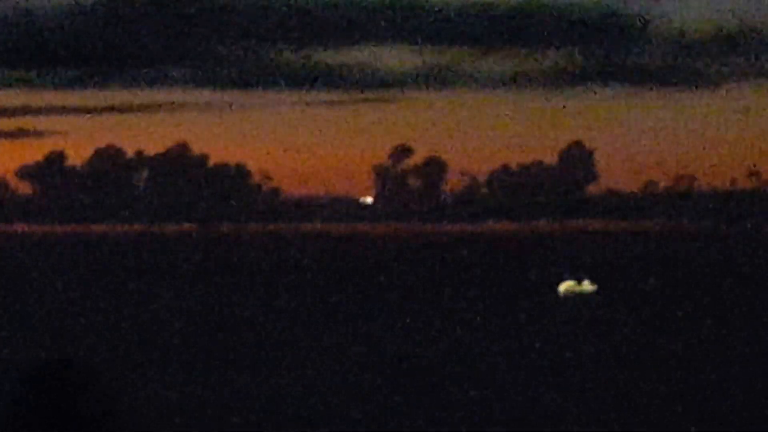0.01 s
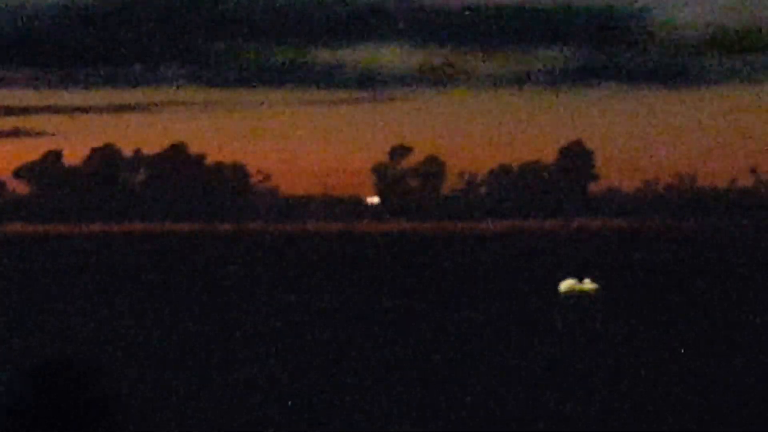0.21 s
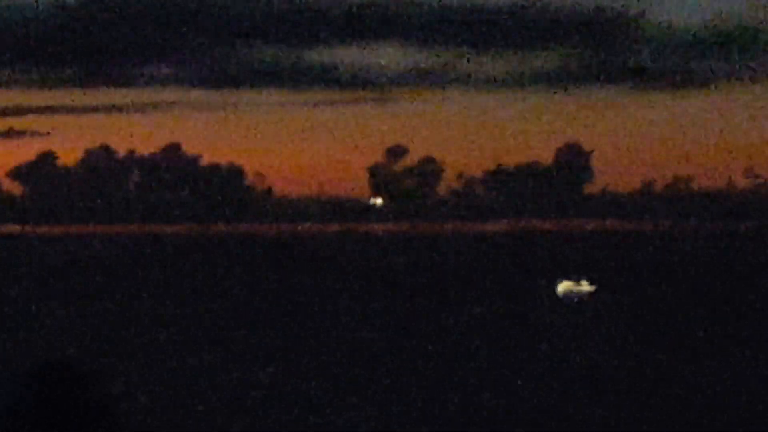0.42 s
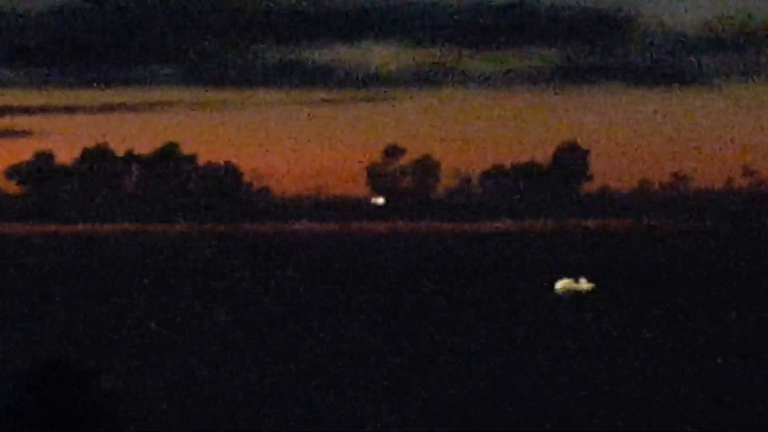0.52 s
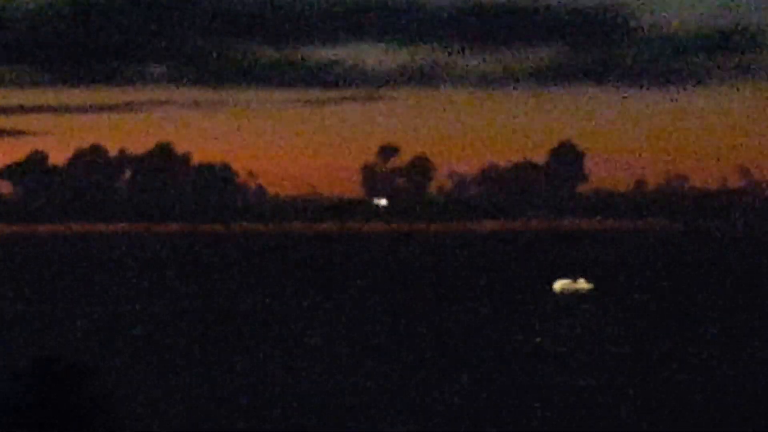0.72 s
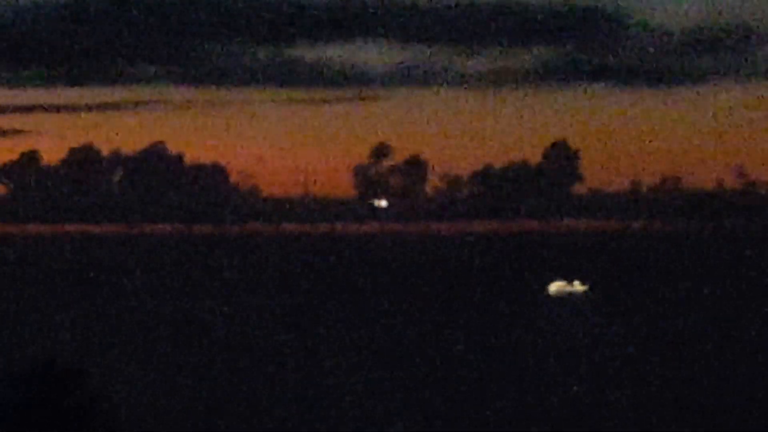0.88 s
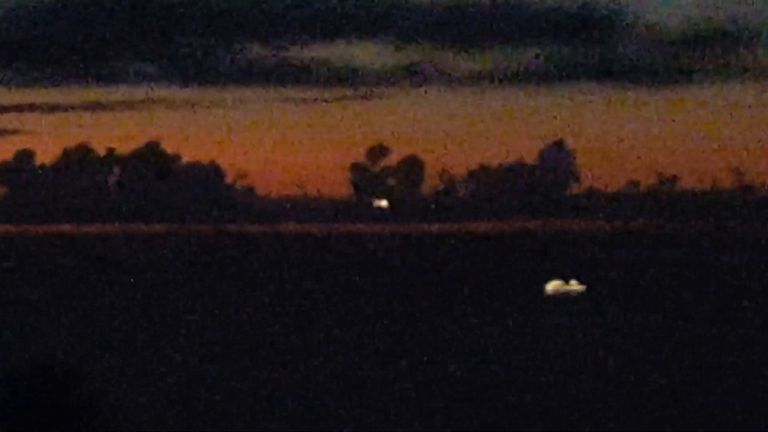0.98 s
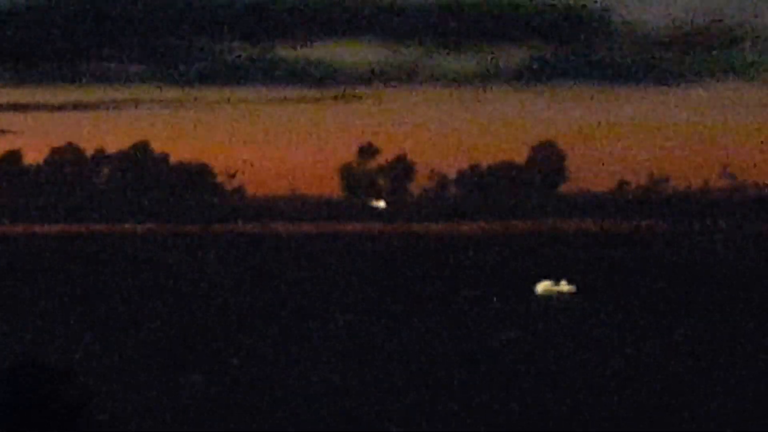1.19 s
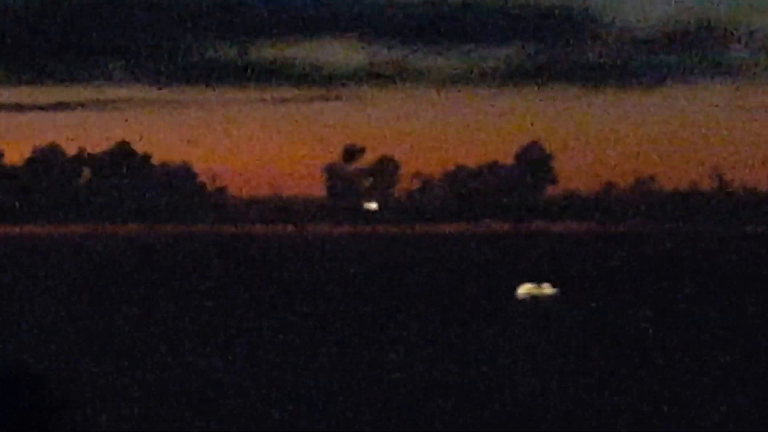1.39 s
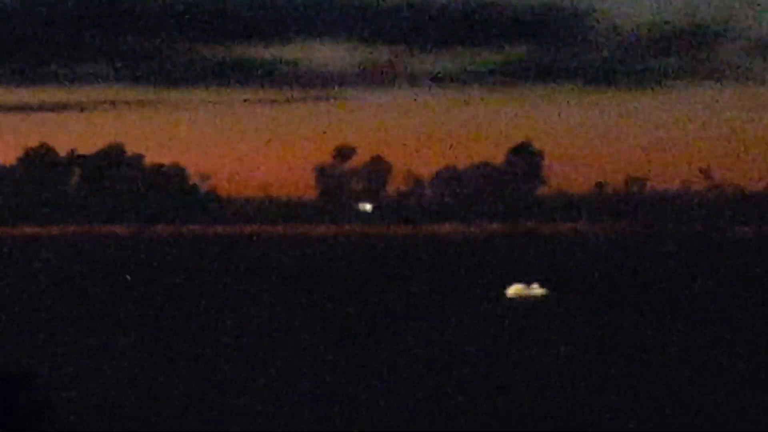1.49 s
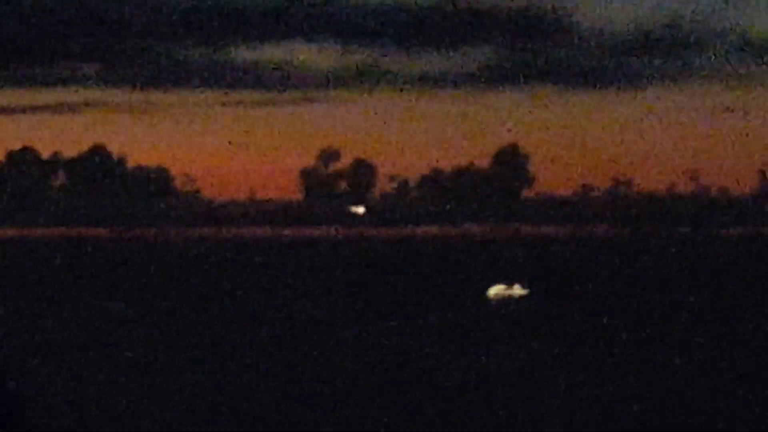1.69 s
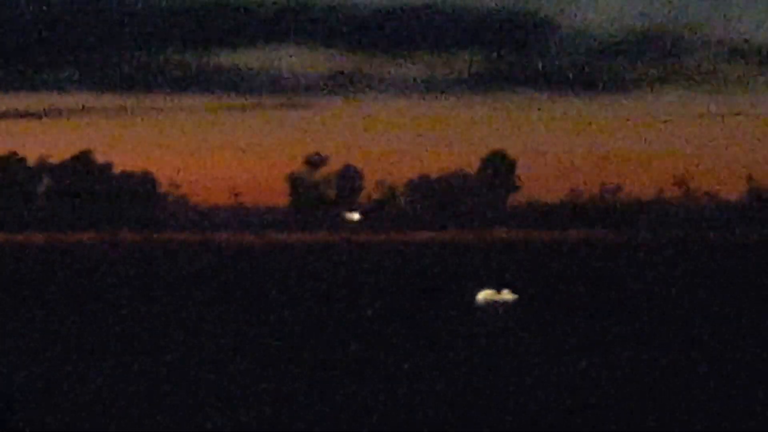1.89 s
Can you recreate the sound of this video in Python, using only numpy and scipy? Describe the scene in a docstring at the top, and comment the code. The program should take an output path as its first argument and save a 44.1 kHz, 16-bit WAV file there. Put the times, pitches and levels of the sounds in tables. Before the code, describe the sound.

Many tiny frogs pipe low-then-rising whistles outdoors, near and far, above a thin steady insect whine

```python
"""Small tree frogs whistle at dusk: low, almost level 'co' notes and rising 'kee' notes, both swept sines.
Near frogs stand out of a far chorus of the same whistles heard only through the trees' sparse noise tail.
Katydids buzz high up as gated noise; crickets trill below them as narrow, throbbing noise bands.
Distant machinery rumbles and drones as filtered noise, and two soft puffs pass nearby.
Foliage throws each whistle back to the two microphones as echoes and a dying tail."""
import sys
import numpy as np
from scipy import signal
from scipy.fft import rfft, irfft
from scipy.io import wavfile
from scipy.ndimage import uniform_filter1d

SR = 44100
rng = np.random.default_rng(int(sys.argv[2]) if len(sys.argv) > 2 else 0)


def bounce(signal):
    """Save signal as a 16-bit WAV file at the path given by the first command-line argument."""
    frames = np.transpose(np.atleast_2d(signal))
    limited = np.clip(frames, -1, 1)
    pcm = np.round(limited * 32767).astype(np.int16)
    wavfile.write(sys.argv[1], SR, pcm)


N = 85995


def gain_of(db):
    """Turns dB into an amplitude gain."""
    return 10 ** (np.asarray(db) / 20)


def evened(x):
    """Scales to rms 1, over all channels together."""
    return x / np.sqrt(np.mean(x ** 2) + 1e-20)


def colour(x, points):
    """Filters by a table of (frequency [Hz], level [dB]), joined on a log-frequency axis."""
    f, db = np.transpose(points)
    hz = np.fft.rfftfreq(x.shape[-1], 1 / SR)
    curve_db = np.interp(np.log(hz + 1), np.log(f), db, -90, -90)
    return irfft(rfft(x) * gain_of(curve_db), x.shape[-1])


def band(hz, width_hz, channels=2):
    """Noise in a bell-shaped band, rms 1; around 0 Hz it is a slow random wavering."""
    f = np.fft.rfftfreq(N, 1 / SR)
    bell = np.exp(-((f - hz) / width_hz) ** 2)
    return evened(irfft(rfft(rng.standard_normal((channels, N))) * bell, N))


def foliage(x, t60, direct, wet, echo_db=0):
    """Leaves scatter sound into a few echoes and a sparse dying tail, different for each side."""
    # echoes, before the direct and wet gains: (delay [s], left level [dB], right level [dB])
    echoes = [(.007, -13.5, -26), (0.012, -8, -13), (0.025, -13, -15.5), (0.035, -16, -23.5),
              (0.051, -15.5, -19), (0.077, -20, -18.5)]
    tail_db, density = -8.5, .05  # tail energy on the left; share of samples that carry a reflection
    t = np.arange(SR // 2) / SR
    hits = rng.standard_normal((2, len(t))) * (rng.random((2, len(t))) < density)
    tail = hits * gain_of(-60 * t / t60) * (t > .01)
    tail *= gain_of(tail_db) / np.linalg.norm(tail[0])
    for delay, left_db, right_db in echoes:
        tail[:, round(delay * SR)] += direct * gain_of(np.array([left_db, right_db]) + echo_db)
    return direct * x + wet * signal.fftconvolve(x, tail, axes=1)[:, :N]


def night_air():
    """Low rumble and hiss, near mono in the bass because long waves reach both microphones alike."""
    # rumble and hiss spectrum: (frequency [Hz], level [dB])
    air = [(20, -49), (60, -4), (100, -8), (145, -0.5), (200, -5.5), (260, -8.5), (500, -15), (1100, -24.5),
           (2100, -28.5), (3300, -37), (7000, -45.5), (16000, -47.5)]
    # likeness of the two sides: (frequency [Hz], left-right likeness [0-1])
    likeness = [(60, .97), (200, 0.94), (300, 0.89), (640, 0.29), (1400, 0.033), (16000, .05)]
    air_db = -53.5
    left, other = rfft(rng.standard_normal((2, N)))
    f, value = np.transpose(likeness)
    same = np.clip(np.interp(np.log(np.fft.rfftfreq(N, 1 / SR) + 1), np.log(f), value), 0, 1)
    right = same * left + np.sqrt(1 - same ** 2) * other
    wash = colour(irfft([left, right], N), air)
    return gain_of(air_db) * evened(wash)


def engine_drone():
    """A distant engine's low drone: a narrow band of noise, equal on both sides, wavering in level."""
    # drone level: (time [s], level [dB])
    hum = [(0.0, -57), (0.64, -53), (0.668, -66), (0.732, -54), (0.83, -58.5), (0.862, -50), (1.4, -65.5),
           (1.428, -61), (1.932, -63.5), (1.95, -71)]
    hum_hz, hum_width_hz = 189.9, 22.6
    level_db = np.interp(np.arange(N) / SR, *np.transpose(hum))
    return band(hum_hz, hum_width_hz, channels=1) * gain_of(level_db)


def crickets():
    """Far crickets overlap into a narrow, throbbing noise band, with two finer trill bands."""
    # spectrum of the mass of crickets: (frequency [Hz], level [dB])
    mass = [(4900, -13.5), (5100, -14.5), (5300, -17), (5500, 7.5), (5680, 3.5), (5900, 0), (6050, -68),
            (6200, -36.5)]
    # single crickets: (frequency [Hz], level [dB])
    trill = [(5179, -79.5), (5674, -66)]
    mass_db, throb_db, chirr_db = -61.5, 1.5, 1  # mass level is before the throb
    throb = throb_db * band(17.4, 4.8, channels=1)
    chirr = chirr_db * band(89, 38)  # fast grain of many overlapping trills
    noise = evened(colour(rng.standard_normal((2, N)), mass))
    trills = sum(gain_of(db) * band(hz, 25) for hz, db in trill)
    return gain_of(mass_db) * noise * gain_of(throb + chirr) + trills


def katydid(row, wing):
    """Short wing strokes, partly alike from cycle to cycle, over their own blurred echoes."""
    # strokes within a wing cycle: (place [0-1], level [dB])
    strokes = [(0, 0), (.27, -9), (.6, -6)]
    # raw scrape before the wing rings: (frequency [Hz], level [dB])
    raw_scrape = [(6000, -6), (15000, 0), (20000, 0)]
    stroke_s, wander = .0007, .0007  # stroke width; relative drift of the wing rate (rms)
    repeat, blur_db = .4, 5  # weight of the repeating scrape; steady blur against the strokes
    wing_same, wing_lag_ms = 0.55, .3  # share of the left hiss that the right microphone hears later
    start, end, rate, left_db, right_db, left_at, right_at = row
    t = np.arange(N) / SR
    drift = wander * evened(uniform_filter1d(rng.standard_normal(N), 6000))
    cycle = (rate * t + np.cumsum(drift) * rate / SR - np.array([[left_at], [right_at]])) % 1

    gate = 0
    for at, db in strokes:
        from_stroke_s = ((cycle - at + .5) % 1 - .5) / rate
        gate = gate + gain_of(db) * np.exp(-.5 * (from_stroke_s / stroke_s) ** 2)

    # the same row of teeth is read in every cycle
    teeth = rng.standard_normal((2, 512))
    alike = np.array([np.interp(cycle[k] * SR / rate, np.arange(512), teeth[k]) for k in range(2)])
    hiss = rng.standard_normal((2, N))
    shared = np.roll(hiss[0], round(wing_lag_ms * SR / 1000))
    hiss[1] = wing_same * shared + np.sqrt(1 - wing_same ** 2) * hiss[1]
    scrape = repeat * evened(colour(alike, raw_scrape)) + (1 - repeat) * evened(colour(hiss, raw_scrape))

    sound = colour(evened(scrape) * (evened(gate) + gain_of(blur_db)), wing)
    fade = np.clip(np.minimum(t - start, end - t) / 0.018, 0, 1)
    return evened(sound) * gain_of([[left_db], [right_db]]) * fade


def katydids():
    """Two katydids, each scrape coloured by the ringing of its own wings."""
    # insects: (start [s], end [s], wing rate [cycles/s], left level [dB], right level [dB],
    #           left cycle start [0-1], right cycle start [0-1])
    singers = [(-.1, 2.1, 126.8, -54.5, -50.5, .7, .6), (-.1, 0.784, 134.5, -52.5, -52, .12, .07)]
    # wing resonances of the first and second insect: (frequency [Hz], level [dB])
    first_wing = [(7600, -21.5), (8200, -15), (8900, -1), (9400, 2.5), (9650, -1.5), (9800, 3), (10200, -4),
                  (10900, -4), (11400, 0), (11700, -1.5), (12300, 0), (12800, 2), (13100, -1), (13700, -3),
                  (14300, -10.5), (14700, -14.5), (15100, -14), (15400, -25.5), (15750, -18)]
    second_wing = [(10500, -9.5), (11400, -2.5), (12000, 0), (12400, -4), (12800, 2), (13200, -0.5),
                   (13750, 1.5), (14300, 0), (14700, -7), (15200, -12), (15750, -21)]
    return katydid(singers[0], first_wing) + katydid(singers[1], second_wing)


def far_chorus(count=260):
    """Many distant frogs at random moments, heard only as the tail scattered by the trees."""
    # pitch range of the far low notes: (lowest [Hz], highest [Hz])
    low_range = (1425, 1672)
    # range of the top of the far high notes: (lowest [Hz], highest [Hz])
    high_range = (2507, 3040)
    # swell of the far high notes: (time [s], level [dB])
    far_swell = [(0, 2), (.3, 0.5), (.6, 1.5), (.75, 0.5), (1, 0.5), (1.2, -1), (1.399, -0.5), (1.65, -1.5),
                 (1.95, 4)]
    low_db, high_db, spread_db = -63, -59, 6  # high level is before its swell; spread is plus or minus
    low, high, span = np.zeros((2, N)), np.zeros((2, N)), N / SR
    for k, (moment, pitch, loudness, side) in enumerate(rng.random((count, 4))):
        start = (k + moment) / count * span - .05
        db = spread_db * (2 * loudness - 1)
        lag_ms = side - .5
        low_hz = np.interp(pitch, [0, 1], low_range)
        top_hz = np.interp(pitch, [0, 1], high_range)
        low += co(start, 0.0863, low_hz, db, db, -42.5, lag_ms, 0)
        # high notes take the same moments, counted back from the end
        high += kee(span - start - .1, 0.1001, top_hz - 330, top_hz, db, db, 0.86, 0.87, lag_ms)
    swell_db = np.interp(np.arange(N) / SR, *np.transpose(far_swell))
    far_low = gain_of(low_db) * evened(foliage(low, 1.5, 0, 1))
    far_high = gain_of(high_db + swell_db) * evened(foliage(high, 0.54, 0, 1))
    return far_low + far_high


def rustles():
    """Two faint puffs of dull noise nearby, each under a bell-shaped envelope."""
    # puffs: (centre time [s], length [s], level before the envelope [dB], top frequency [Hz])
    puffs = [(1.352, 0.018, -47.5, 613), (1.595, 0.019, -50.5, 2490)]
    t = np.arange(N) / SR
    out = np.zeros((2, N))
    for centre, length, db, top_hz in puffs:
        spectrum = [(200, 0), (top_hz, -8), (top_hz * 3, -25)]
        noise = evened(colour(rng.standard_normal((2, N)), spectrum))
        out += gain_of(db) * np.exp(-((t - centre) / length * 2) ** 2) * noise
    return out


def whistle(start, length, lag_ms, pitch, level_db, rise, fall, octave_db):
    """A near-pure tone from the vocal sac, heard by both microphones; pitch and level_db are curves."""
    third_db = -20.5  # third harmonic, below the octave
    first = max(round((start - .002) * SR), 0)
    last = min(round((start + length + .002) * SR), N)
    at = np.arange(first, last)
    t = at / SR - start - np.array([[0], [lag_ms / 1000]])
    inside = np.clip(t, 0, length)
    ramp = np.clip(np.minimum(t / rise, (length - t) / fall), 0, 1)
    shape = np.sin(np.pi / 2 * ramp) ** 2
    phase = 2 * np.pi * np.cumsum(pitch(inside) * (t > 0), 1) / SR
    overtones = gain_of(octave_db) * (np.sin(2 * phase) + gain_of(third_db) * np.sin(3 * phase))
    out = np.zeros((2, N))
    out[:, at] = np.sqrt(2) * shape * gain_of(level_db(inside / length)) * (np.sin(phase) + overtones)
    return out


def co(start, length, hz, left_db, right_db, octave_db, lag_ms, swell_db):
    """The low note scoops up to pitch and sags a little."""
    scoop_hz, scoop_s, sag_hz = 64.8, .02, 37.8
    rise_s, fall_s = 0.014, 0.015

    def pitch(t):
        return hz - scoop_hz * np.exp(-t / scoop_s) - sag_hz * (t / length) ** 3

    def level_db(place):
        return np.array([[left_db], [right_db]]) - swell_db * np.maximum(1 - place / 0.6, 0)

    return whistle(start, length, lag_ms, pitch, level_db, rise_s, fall_s, octave_db)


def kee(start, length, first_hz, last_hz, left_db, right_db, left_swell_db, right_swell_db, lag_ms,
        far_db=0):
    """The high note sweeps up, fast at first; its level moves by the swell, then fades."""
    bend, peak, fade_db = 2.131, .62, 7  # sweep curvature; place where the fade begins [0-1]; fade
    rise_s, soft_s_per_db, fall_s = 0.0014, .0004, 0.024  # quiet notes start more slowly
    swell_db = np.array([[left_swell_db], [right_swell_db]])

    def pitch(t):
        swept = (1 - np.exp(-bend * t / length)) / (1 - np.exp(-bend))
        return first_hz + (last_hz - first_hz) * swept

    def level_db(place):
        swell = swell_db * np.maximum(1 - place / peak, 0)
        fade = fade_db * np.maximum(place - peak, 0) / (1 - peak)
        return np.array([[left_db], [right_db]]) - swell - fade

    return whistle(start, length, lag_ms, pitch, level_db, rise_s + soft_s_per_db * far_db, fall_s, -61.0)


def near_low_notes():
    """The near frogs' 'co' notes, fluttering together, with the foliage's answer."""
    # notes, levels before flutter and foliage: (start [s], length [s], pitch [Hz], left level [dB],
    #   right level [dB], octave level [dB re fundamental], right lag [ms], swell [dB])
    low_notes = [(.048, .048, 1496, -53, -55, -30, 0.25, 4), (.11, .06, 1500, -54, -57, -30, 0.24, 6),
                 (.138, 0.09, 1596, -36.5, -39.5, -21.5, 0.28, 3),
                 (.16, 0.083, 1525, -35.5, -38, -15, 0.25, 8.5),
                 (.225, .09, 1545, -40, -43.5, -10, .24, -3),
                 (0.251, 0.097, 1588, -41.5, -50.5, -25.5, .25, 1),
                 (0.427, 0.13, 1653, -47.5, -52, -36.5, .0524, -7),
                 (.555, 0.064, 1546, -51, -62, -14.5, .12, 2), (.6, 0.075, 1471, -48, -53, -2, 0.18, 4),
                 (.76, 0.087, 1536, -56, -73, -27.5, .12, 0), (1.138, .076, 1558, -30, -38, -34, 0.26, 13),
                 (1.217, .042, 1550, -31.5, -46, -41, 0.16, 6.5),
                 (1.242, 0.031, 1552, -48, -46, -41.5, 0.23, 0), (1.27, .05, 1540, -54, -56, -30, .11, -2),
                 (1.5, 0.064, 1495, -51, -57, -27, 0.27, 3),
                 (1.885, 0.084, 1637, -50.5, -55, -18, 0.099, 4),
                 (1.885, 0.095, 1438, -57.5, -59, -23, .14, -7)]
    flutter = gain_of(.7 * band(0, 30))  # 0.7 dB rms
    low = sum(co(*row) for row in low_notes) * flutter
    return foliage(low, 0.39, 0.81, .4, echo_db=-9)


def near_high_notes():
    """The near frogs' 'kee' notes; quieter frogs sit further off, flutter more and arrive more blurred."""
    # notes, levels before flutter and foliage: (start [s], length [s], first pitch [Hz],
    #   last pitch [Hz], left level [dB], right level [dB], left swell [dB], right swell [dB], right lag [ms])
    high_notes = [(-.04, 0.09, 2574, 2888, -52, -64, -5, -9, .079),
                  (-.01, 0.092, 2500, 2700, -55.5, -60, -8.5, -8, -0.2),
                  (0.126, 0.089, 2600, 2876, -56, -57.5, -5.5, -6, 0.38),
                  (0.164, .13, 2500, 2844, -49, -51, 1, -0.5, 0.078),
                  (.309, .125, 2270, 2660, -52, -47, -3, 3, -.2),
                  (0.366, 0.048, 2800, 2970, -55, -56, 8.5, 9, 0.23),
                  (0.39, .105, 2480, 2850, -35, -33.5, -7, 12, 0.36),
                  (.42, .115, 2350, 2840, -30, -21, 10, 16, -.27),
                  (.463, .04, 2700, 2800, -24, -36, 0, 0, .3),
                  (0.511, 0.04, 2850, 2976, -45.5, -43, 6.5, 6.5, 0.083),
                  (.517, .1, 2390, 2770, -37, -36, -4.5, 12, .13),
                  (0.794, 0.085, 2520, 2848, -47, -46, 1, 3, 0.28),
                  (.838, .11, 2320, 2740, -43.5, -46, 6, 5, 0.29),
                  (.925, .065, 2450, 2700, -56, -58, -4, -4, 0.074),
                  (0.974, 0.069, 2500, 2713, -57, -60, 1, 2, .08),
                  (1.04, .08, 2650, 2920, -59, -58.5, 1, 4, .063),
                  (1.124, .1, 2700, 3075, -64, -66, -2, -1, 0.077),
                  (1.2, 0.071, 2750, 3022, -61.5, -65, 3, 4, 0.066),
                  (1.345, .1, 2330, 2727, -55, -58.5, 6, 6, 0.12),
                  (1.423, .105, 2240, 2750, -28, -31, 19, 19, -.057),
                  (1.518, .07, 2580, 2730, -39, -42, 0, 0, .1),
                  (1.665, .11, 2230, 2560, -57, -59, 8.5, 8.5, 0.067),
                  (1.735, .085, 2480, 2700, -56, -55, -2, -2, 0.027),
                  (1.847, 0.087, 2480, 2685, -57, -62, -1.5, -2, 0.073)]
    near_db, wet_per_db = -28.5, 0.4672  # level of a frog that counts as near; added blur per dB below it
    flutter_db, flutter_per_db = .8, .15
    shimmer = band(0, 63.5)  # moving air and leaves
    notes, blurred = np.zeros((2, N)), np.zeros((2, N))
    for row in high_notes:
        far_db = max(near_db - max(row[4:6]), 0)
        path = np.roll(shimmer, rng.integers(N), 1)  # another path for each note
        note = kee(*row, far_db) * gain_of((flutter_db + flutter_per_db * far_db) * path)
        notes += note
        blurred += note * np.sqrt(gain_of(wet_per_db * far_db) - 1)
    return foliage(notes, 0.39, 0.85, 0.75) + foliage(blurred, 0.21, 0, 0.88)


def scene():
    """All sources together, from the distant background to the near frogs."""
    background = night_air() + engine_drone() + crickets() + katydids()
    return background + far_chorus() + rustles() + near_low_notes() + near_high_notes()


def record(dry):
    """Limits the band with a steep linear-phase low-pass filter at 15.7 kHz."""
    low_pass = signal.firwin(1023, 15700, window=("kaiser", 9), fs=SR)
    return signal.oaconvolve(dry, low_pass[None], "same")


dry = scene()
out = record(dry)
bounce(out)
```